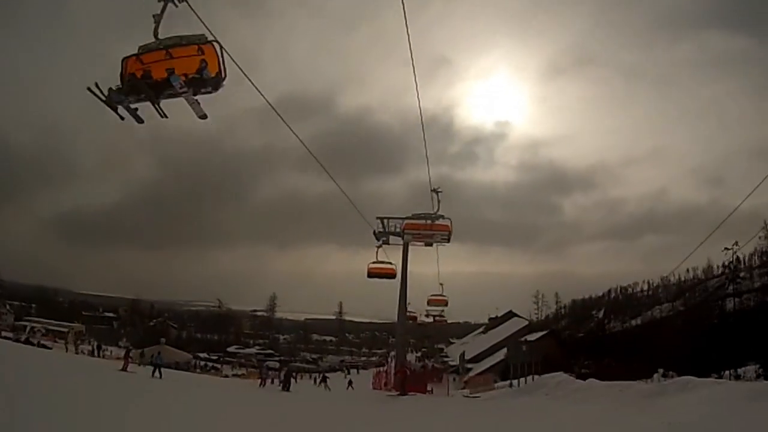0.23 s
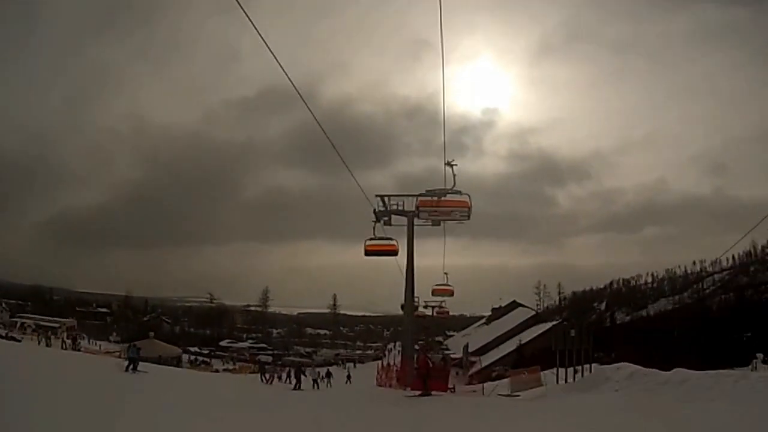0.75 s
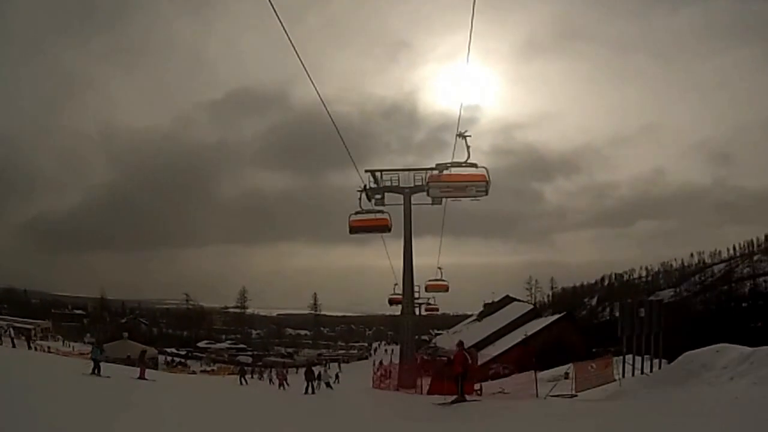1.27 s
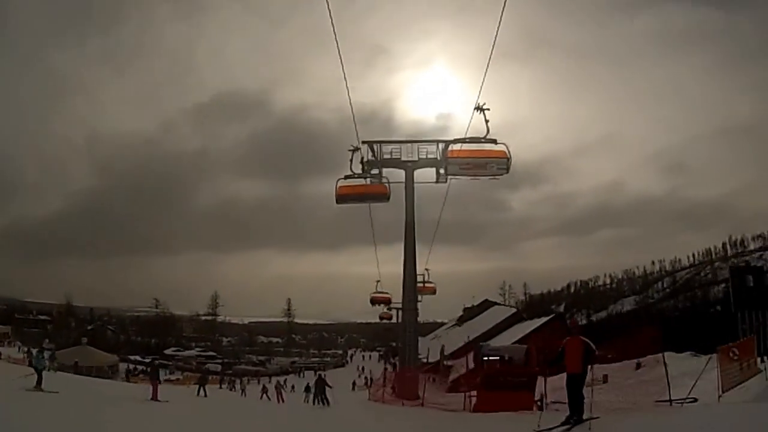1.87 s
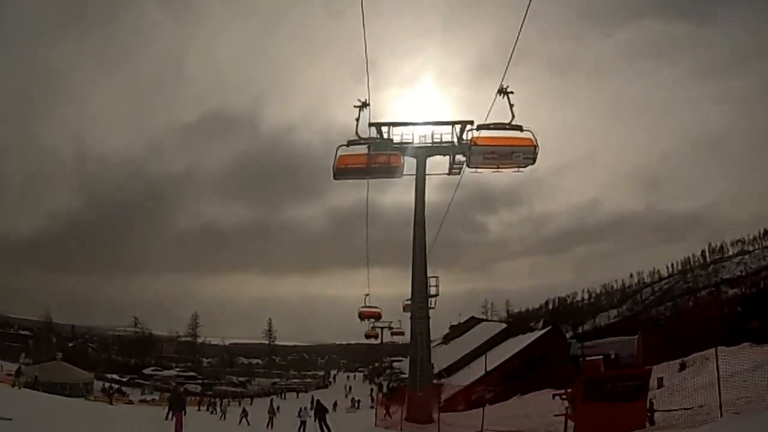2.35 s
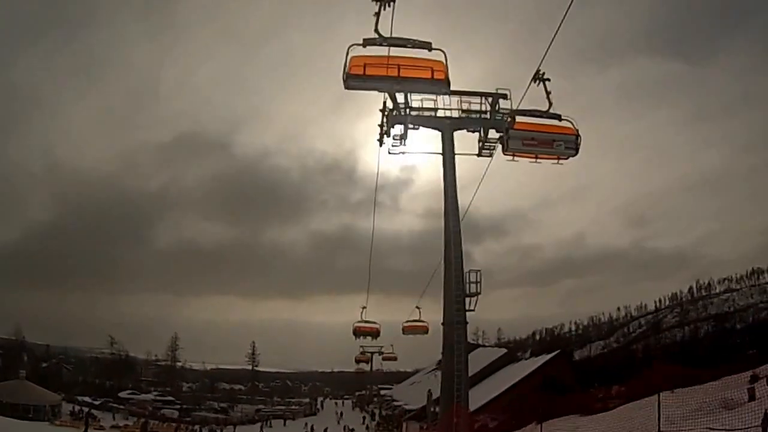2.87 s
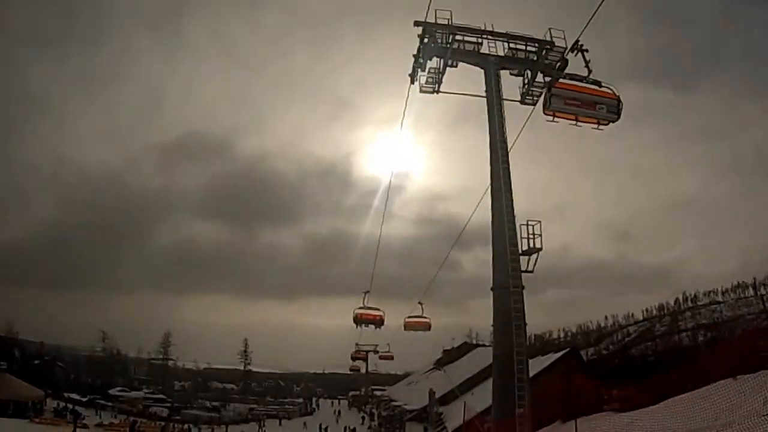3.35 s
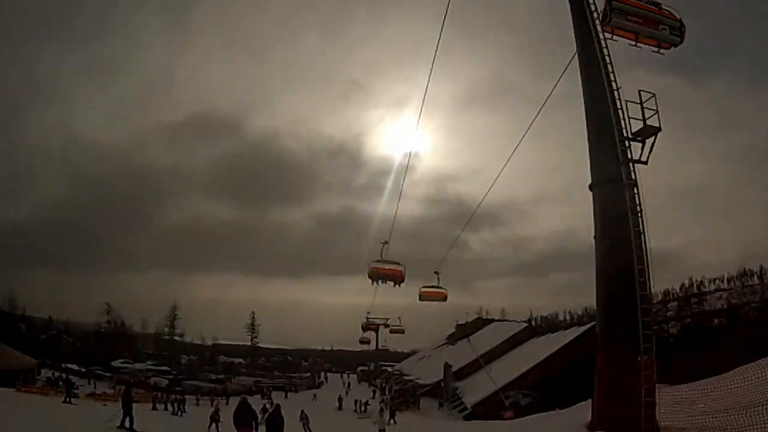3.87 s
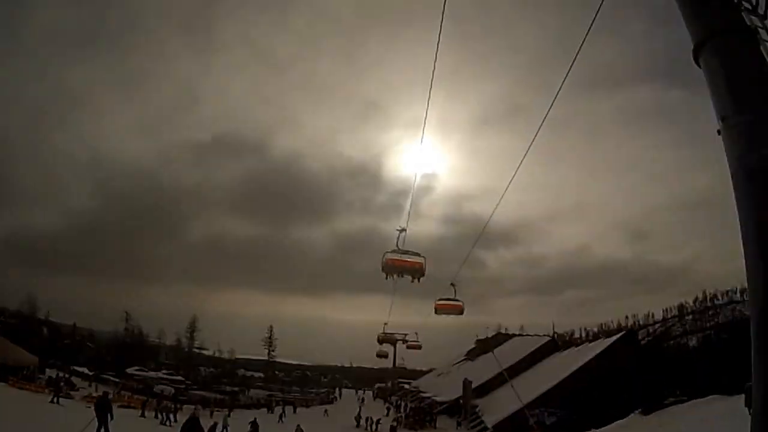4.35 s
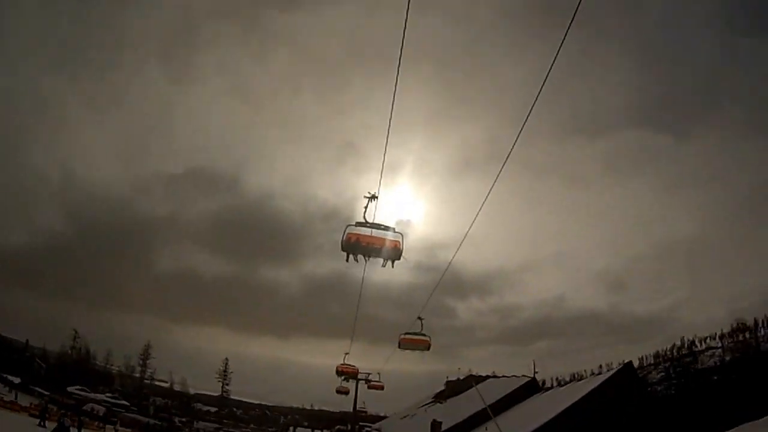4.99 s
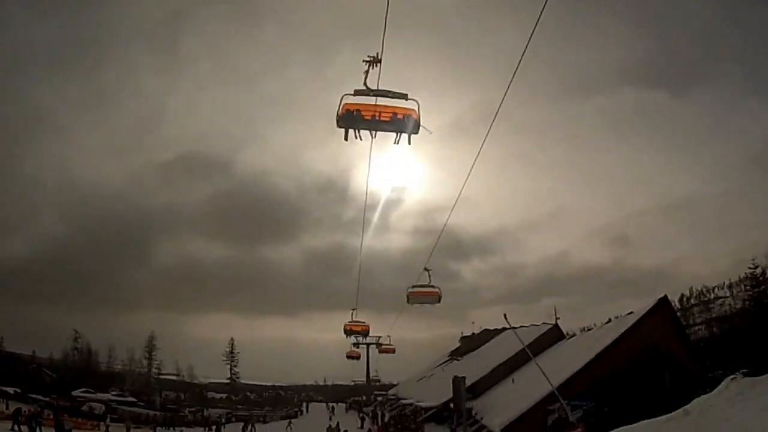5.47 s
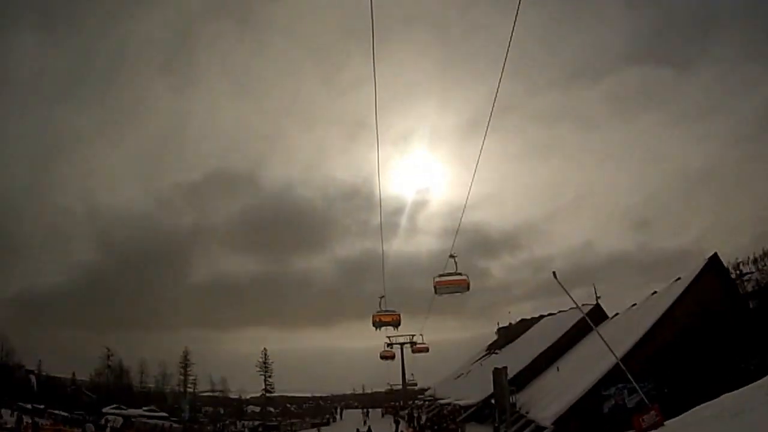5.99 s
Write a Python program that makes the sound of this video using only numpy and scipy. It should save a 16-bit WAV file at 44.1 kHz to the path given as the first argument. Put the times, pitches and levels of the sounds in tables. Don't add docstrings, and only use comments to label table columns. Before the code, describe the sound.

Low wind lumps thump a sealed microphone over a dull roar while skis hiss and scrape on snow, with hard booming gusts near 4.8 seconds.

```python
import sys
import numpy as np
from scipy import signal
from scipy.fft import rfft, irfft
from scipy.io import wavfile
from scipy.ndimage import uniform_filter1d

SR = 44100
rng = np.random.default_rng(int(sys.argv[2]) if len(sys.argv) > 2 else 0)


def natural_amplitude(level_db):
    exponent = np.asarray(level_db, float) / 20
    return 10 ** exponent


def dump_mix(stems):
    frames = np.atleast_2d(stems).T
    limited = np.clip(frames, -1, 1)
    pcm = np.round(limited * 32767).astype(np.int16)
    wavfile.write(sys.argv[1], SR, pcm)


N = 274743

# start_s, hiss_db (edge pressure), brightness_db (snow hardness)
EDGES = [(0, -49.5, 2), (.2, -51, 2), (1.05, -52, 2.5), (1.3, -51.5, 4.5), (2.1, -50, 3.5), (2.9, -48, 1.5),
         (3.1, -50, 2), (3.47, -44, 1), (3.73, -51.5, 3.5), (3.745, -44, 6), (3.98, -37, 4.5),
         (4.3, -44.5, -.5), (4.5, -50, 0), (5.0, -48.5, 2.5), (5.25, -47, -4.5), (5.56, -48, 0),
         (5.75, -44, 5.5), (5.98, -47, -1)]
# top_s, push_db, pointed_share [0-1], swing_hz, crackle_db
HARD_GUSTS = [
    (4.7352, -5.5, .12, 41, -40),
    (4.8432, -3.4, .35, 31, -39.5),
    (4.8910, -9, .15, 35, -48),
]


def even(x):
    return x / np.sqrt(np.mean(x ** 2) + 1e-20)


def columns(rows):
    s, *values = np.transpose(rows)
    return [np.interp(np.arange(N) / SR, s, v) for v in values]


def lumps(rows):
    t = np.arange(N) / SR
    return sum(natural_amplitude(2 * db) * np.exp(-((t - s) / max(half_s, .005)) ** 2) for s, db, half_s in rows)


def coloured(points):
    f, db = np.transpose(points)
    hz = np.fft.rfftfreq(N, 1 / SR)
    gain = natural_amplitude(np.interp(np.log(hz + 1), np.log(f + 1), db))
    return even(irfft(rfft(rng.standard_normal(N)) * gain, N))


def drift(low_hz, high_hz):
    return coloured([(low_hz / 2, -40), (low_hz, 0), (high_hz, -3), (high_hz * 2, -40), (high_hz * 8, -130)])


def high_pass(x, hz):
    return signal.sosfilt(signal.butter(3, hz, "high", fs=SR, output="sos"), x)


def resonate(x, modes):
    hz = abs(np.fft.fftfreq(8192, 1 / SR))
    power = sum(natural_amplitude(2 * db) / (1 + (2 * (hz - f) / width_hz) ** 2) ** 2 for f, width_hz, db in modes)
    log_gain = np.log(power + 1e-10) / 2
    phase = -signal.hilbert(log_gain).imag
    taps = np.fft.ifft(np.exp(log_gain + 1j * phase)).real[:2048]
    return signal.oaconvolve(x, taps / np.linalg.norm(taps))[:N]


def add(mix, s, sound):
    part = mix[round(s * SR):][:len(sound)]
    part += sound[:len(part)]


def ducked():
    duck_db, lag_s, recovery_s = -9, 0.012, 0.062
    after_s = np.arange(N)[None] / SR - np.array(HARD_GUSTS)[:, :1] - lag_s
    dip = np.clip(after_s / .004, 0, 1) * np.exp(-(after_s / recovery_s) ** 2)
    return natural_amplitude(duck_db * dip.max(0))


def wind():
    # start_s, calm_db (pressure between gusts), roar_db
    wind_course = [(0, -32.5, -56), (.9, -32, -54.5), (1.4, -32, -53.5), (1.85, -45, -54.5),
                   (2.4, -39.5, -53.5), (2.8, -28.5, -54), (3.2, -37, -53), (3.32, -22, -53),
                   (3.7, -32.5, -54), (3.85, -22, -54), (4.15, -36, -52), (4.4, -35, -49.5),
                   (4.7, -18.5, -52.5), (4.95, -32, -50), (5.2, -22.5, -52), (5.5, -38, -52),
                   (5.85, -30.5, -51.5), (6.23, -34, -56)]
    # top_s, pressure_db, half_s, fast_share_db (small fast eddies)
    gust_events = [(0.2, -29.5, 0.053, 5), (0.394, -29.3, 0.025, -15), (0.528, -29, 0.041, -1),
                   (0.685, -37.5, 0.025, 12), (0.996, -30, 0.064, -11), (1.23, -35, 0.029, 7),
                   (1.432, -43, 0.017, 3), (1.58, -30, 0.091, -3), (1.9, -24, 0.077, -2),
                   (2.108, -27.5, 0.041, 2.5), (2.277, -30, 0.067, 2), (2.49, -27, 0.026, 4.5),
                   (2.634, -35, 0.016, 13), (2.978, -31.5, 0.02, 12.5), (3.136, -39, 0.015, 16),
                   (3.515, -24, 0.11, 3.5), (3.894, -19.5, 0.017, 3), (4.018, -16.5, 0.053, 1.5),
                   (4.22, -23.5, 0.065, 2.5), (4.34, -25, 0.025, -13), (4.415, -21.5, 0.019, -11),
                   (4.5, -26, 0.022, -6), (5.007, -17.5, 0.029, -19), (5.396, -23.5, 0.021, -6),
                   (5.53, -28.5, 0.039, -6), (5.728, -19, 0.068, -7), (5.979, -18.5, 0.015, -3),
                   (6.1, -30, 0.07, 5)]
    # hz, level_db per Hz
    eddy_spectrum = [(7.1, -24), (12, 4), (32, 2.5), (50, 3.5), (69, -6.5), (102, -23), (230, -44),
                     (440, -120)]
    # hz, level_db per Hz
    roar_spectrum = [(60, -9.5), (110, 0), (200, -6.5), (400, -11), (700, -15.5), (1100, -18.5),
                     (1500, -62), (9000, -85)]

    calm_db, roar_db = columns(wind_course)
    roar_db = roar_db + 0.3 * (columns(EDGES)[0] + 50)
    slow_power = natural_amplitude(2 * calm_db) + lumps([(s, db, half_s) for s, db, half_s, _ in gust_events])
    fast_power = natural_amplitude(2 * calm_db) + lumps([(s, db + share_db, half_s) for s, db, half_s, share_db in gust_events])

    eddies = coloured(eddy_spectrum)
    own_level = np.sqrt(uniform_filter1d(uniform_filter1d(eddies ** 2, 2000), 2000) + 1e-3)
    eddies = even(eddies / own_level ** 0.56)
    fast = signal.sosfiltfilt(signal.butter(3, 58, "high", fs=SR, output="sos"), eddies)
    slow = eddies - fast
    eddies = np.sqrt(slow_power) * slow + np.sqrt(fast_power) * natural_amplitude(drift(2.3, 24.8)) * fast

    first_s, last_s = HARD_GUSTS[0][0], HARD_GUSTS[-1][0]
    swept_s = [first_s - .03, first_s - .01, last_s + .02, last_s + .04]
    swept = np.interp(np.arange(N) / SR, swept_s, [1, .12, .12, 1])
    roar = natural_amplitude(roar_db + 3.0 + 1.6 * drift(5.9, 29.0)) * coloured(roar_spectrum)
    return eddies * swept + roar * ducked()


def skis():
    # top_s, level_db, half_s
    chatter_bouts = [(0.08, -43, .05), (0.445, -43.5, 0.043), (0.619, -36.5, 0.013), (0.92, -61, 0.022),
                     (1.257, -44, 0.024), (1.68, -45, .018), (1.751, -44, .02), (1.98, -40.5, .07),
                     (2.075, -45, .02), (2.505, -46, 0.025), (2.644, -45, .019), (2.75, -53, .022),
                     (2.883, -41.5, .05), (3.3, -43, 0.09), (3.447, -36.5, 0.13), (3.672, -38, 0.0089),
                     (3.765, -35, 0.025), (3.97, -31.5, 0.14), (4.2, -35.5, 0.084), (4.824, -47, .018),
                     (4.94, -37, 0.029), (5.029, -36.5, 0.011), (5.388, -40.5, .022), (5.582, -49, .012),
                     (5.63, -40, 0.011), (5.752, -33.5, 0.022), (5.852, -40, 0.028)]
    # start_s, peak_db, treble_db (re peak), snap_db (first break)
    crust_events = [(0.0672, -32.5, -33, 5.5), (0.4331, -19, -32, -10), (0.4714, -35, -9.5, -1),
                    (0.606, -30.5, -35, 1.5), (0.687, -35, -13, -3), (0.742, -27, -24, -15),
                    (0.9072, -34.5, -14, 3), (1.672, -34.5, -17, 2), (1.7664, -52, -13, -2),
                    (2.0682, -32, -32, 6), (2.292, -35, -27, 3), (2.495, -32, -31, 5), (2.64, -34, -17, 0),
                    (2.7355, -35.5, -34, 8.5), (3.2585, -30, -30, 1.5), (3.5475, -30.5, -33, 6),
                    (3.6546, -23, -20, -3.5), (3.738, -31, -20, 2), (3.7436, -32.5, -22, 10.5),
                    (3.8147, -35, -14, -7), (3.8694, -47, -15, 1.5), (5.242, -33, -32, 3),
                    (5.5738, -28, -16.5, 1.5), (5.6161, -28.5, -15.5, 1), (5.702, -26, -13, -4),
                    (5.9282, -24, -28, -2)]
    # hz, width_hz, level_db
    housing_modes = [(1464, 388, 4), (2205, 800, 1.5), (2533, 370, -3), (3264, 1170, -10.5),
                     (4697, 1150, -9.5), (5510, 500, -20.5), (6574, 910, -17.5), (7780, 1260, -27.5),
                     (9020, 1500, -30), (10840, 1240, -31.5), (12200, 1900, -39), (13900, 990, -42)]
    # hz, width_hz, level_db
    cavity_modes = [(1680, 200, 1), (1666, 506, -2.5)]
    grains_per_s, grain_db, spread_db = 900, -10.0, 7.5
    crust_s, snap_hz = 0.011, 1658

    edge_db, bright_db = columns(EDGES)
    press_db = edge_db + 50
    bouts = lumps(chatter_bouts)
    hiss_db = 10 * np.log10(natural_amplitude(2 * edge_db) + natural_amplitude(2 * -17) * bouts)
    ring_db = 10 * np.log10(natural_amplitude(2 * (-49.5 + 1.12 * press_db)) + natural_amplitude(2 * -2) * bouts)
    spray_db = -0.5 + 0.29 * press_db - 0.72 * bright_db

    grains = natural_amplitude(spread_db * np.minimum(rng.exponential(1, N), 4)) * (rng.random(N) < grains_per_s / SR)
    grains *= rng.choice([-1., 1.], N)
    slide = even(rng.standard_normal(N) + natural_amplitude(grain_db) * even(grains))
    chatter_db = drift(9.9, 62)
    low = natural_amplitude(hiss_db + 0.46 * chatter_db + 0.8 * drift(2.1, 68)) * slide
    high = natural_amplitude(hiss_db + bright_db + 0.19 * chatter_db + 1.3 * drift(0.77, 50)) * slide
    ring = natural_amplitude(ring_db - 2.0 + 1.85 * drift(2.3, 56)) * rng.standard_normal(N)

    snaps = np.zeros(N)
    t = np.arange(2600) / SR
    jolt = np.minimum(t / .0015, 1) * np.exp(-t / .004) * np.sin(2 * np.pi * snap_hz * t)
    for s, peak_db, treble_db, snap_db in crust_events:
        burst = np.exp(-(t / crust_s) ** 2) * rng.standard_normal((3, len(t)))
        add(snaps, s, natural_amplitude(peak_db + snap_db) * jolt)
        add(ring, s, natural_amplitude(peak_db - 24.0) * burst[0])
        add(low, s, natural_amplitude(peak_db - 21.5) * burst[1])
        add(high, s, natural_amplitude(peak_db + treble_db + 5.0) * burst[2])

    body = signal.sosfilt(signal.butter(3, 3800, fs=SR, output="sos"), low)
    spray = (natural_amplitude(spray_db) - 1) * high_pass(high, 8200)
    drive = body + high_pass(high, 3800) + spray
    return ducked() * (natural_amplitude(2.0) * resonate(drive, housing_modes) + resonate(ring, cavity_modes)) + snaps


def blows():
    lead_s, crackle_s = .04, .003
    crackle_spectrum = [(300, 8), (1200, 4), (3000, 0.0), (5000, -2.5),
                        (7000, -9.5), (13000, -18), (16000, -27)]
    push, crackle = np.zeros(N), np.zeros(N)
    t = np.arange(-lead_s * SR, .09 * SR) / SR
    tip = np.exp(-abs(t) / .003)
    swing_decay = np.where(t < 0, np.exp(t / .012), np.exp(-(t / .027) ** 2))
    fade = signal.windows.tukey(len(t), .3)
    for s, push_db, pointed, swing_hz, crackle_db in HARD_GUSTS:
        swing = np.cos(2 * np.pi * swing_hz * t) * swing_decay
        add(push, s - lead_s, natural_amplitude(push_db) * ((1 - pointed) * swing + pointed * tip) * fade)
        add(crackle, s - lead_s, natural_amplitude(crackle_db) * np.exp(-(t / crackle_s - .6) ** 2))
    smooth = signal.sosfilt(signal.butter(2, 260, fs=SR, output="sos"), push)
    return smooth + crackle * coloured(crackle_spectrum)


def scene():
    self_noise = natural_amplitude(-74.5) * ducked() * rng.standard_normal(N)
    return (wind() + skis() + blows() + self_noise)[None]


def limited(x):
    level_db = 20 * np.log10(abs(uniform_filter1d(x[0], 60)) + 1e-9)
    fall_db = np.arange(N) * 220. / SR
    held_db = np.maximum.accumulate(level_db + fall_db) - fall_db
    over_db = np.maximum(held_db + 11.0, 0)
    late_db = np.roll(signal.lfilter([.004], [1, -.996], over_db), 180)
    return x / natural_amplitude(0.7 * late_db)


def thinned(x):
    from_hz, keep_db = 12800, -1.5
    hz, _, z = signal.stft(x, SR, nperseg=2048, noverlap=1024)
    sliver = uniform_filter1d(abs(z) ** 2, size=6, axis=-2)
    around = uniform_filter1d(np.median(sliver, axis=-1, keepdims=True), size=30, axis=-2)
    reach_db = np.clip((hz - from_hz) / 60., -40, 1.5) + np.clip((hz - 14350) / 150., 0, 4)
    kept = sliver > around * natural_amplitude(2 * (keep_db + reach_db[:, None] - 1))
    return signal.istft(z * kept, SR, nperseg=2048, noverlap=1024)[1][..., :N]


def top_cut(x):
    return signal.sosfilt(signal.butter(12, 15440, fs=SR, output="sos"), x)


def record(dry):
    edge = signal.firwin(601, 15080, window=("kaiser", 9), fs=SR)
    mix = thinned(signal.oaconvolve(limited(dry), edge[None], "same"))
    return top_cut(mix)


dry = scene()
out = record(dry)
dump_mix(out)
```